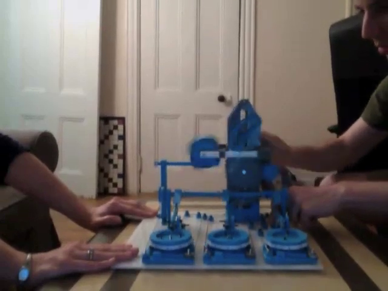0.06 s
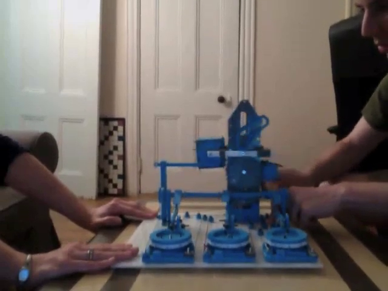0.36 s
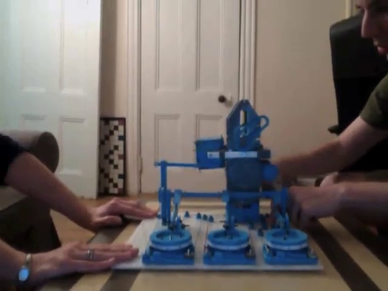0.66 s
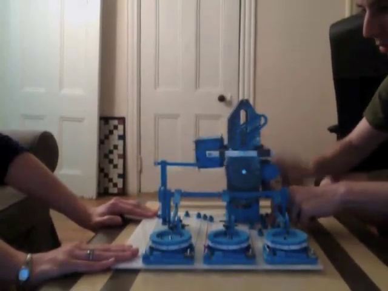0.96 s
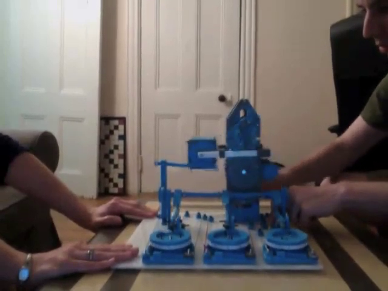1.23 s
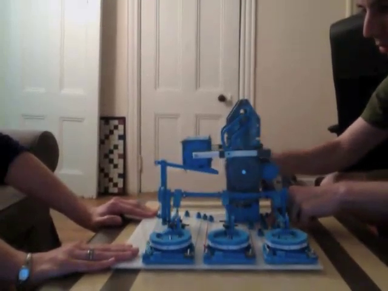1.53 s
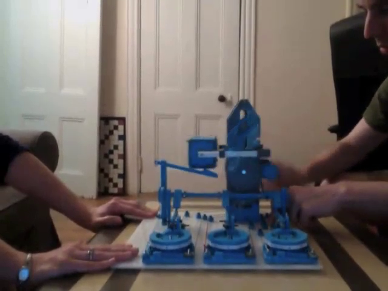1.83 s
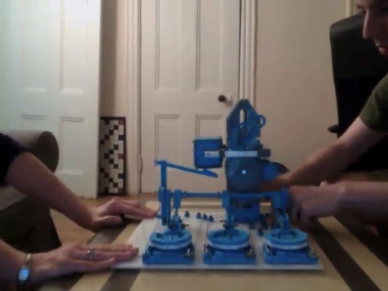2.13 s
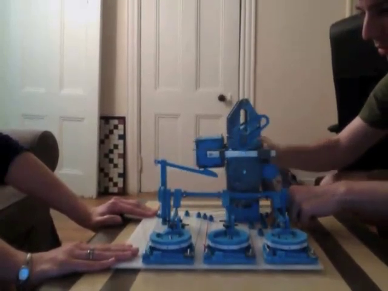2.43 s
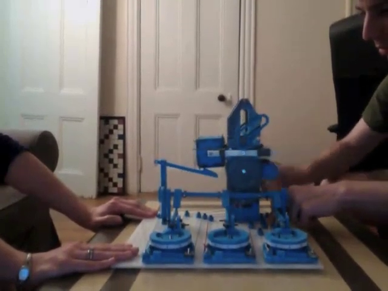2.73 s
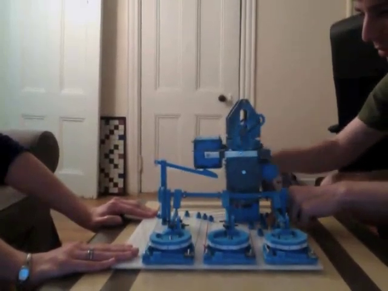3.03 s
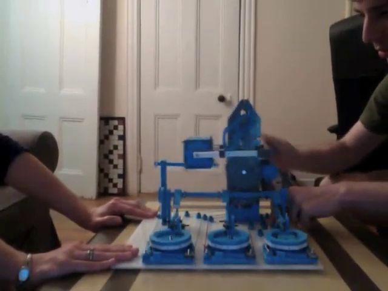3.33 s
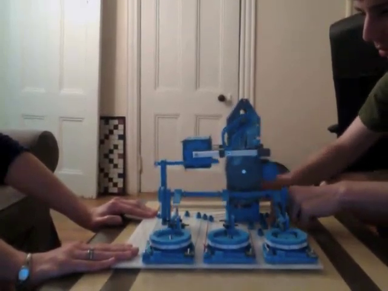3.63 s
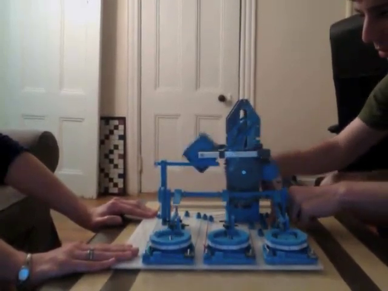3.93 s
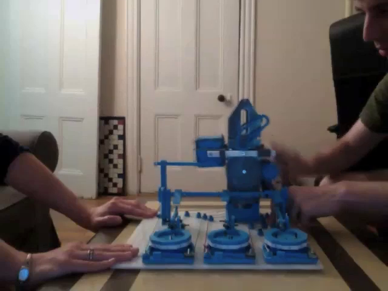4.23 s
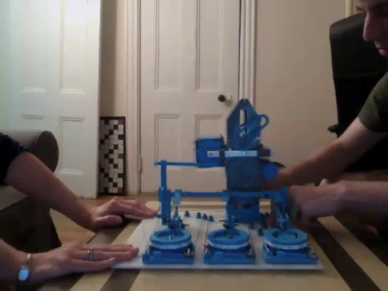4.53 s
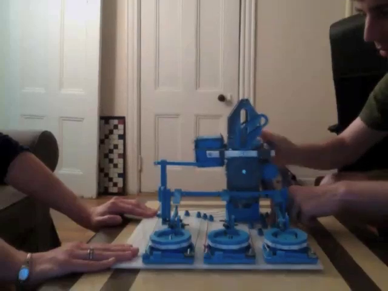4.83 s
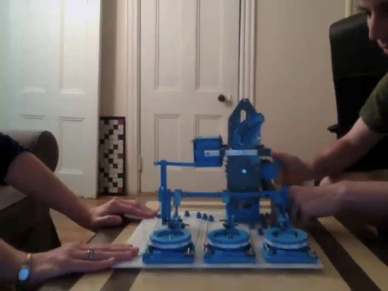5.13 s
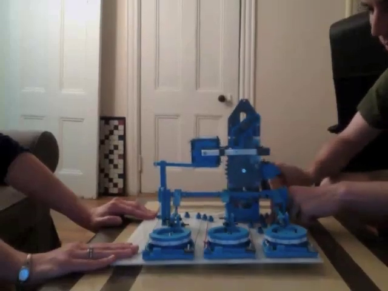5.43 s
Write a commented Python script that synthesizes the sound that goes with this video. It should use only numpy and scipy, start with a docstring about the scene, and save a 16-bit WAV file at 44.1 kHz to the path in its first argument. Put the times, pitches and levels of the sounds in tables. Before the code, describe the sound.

A large plastic machine on a board is cranked by hand in a small room. Its levers give irregular hollow clacks that thud lightly into the board, mixed with dry knocks, small ticks and the rubbing chatter of gears. Two louder, rattling clacks stand out, one at the start and one about four seconds in, then the clatter thins. The microphone is fairly near, with a brief room echo and faint background noise.

```python
"""Levers clack as a large plastic machine on a board is cranked by hand in a small room.
Each impact rings the damped modes of the hollow parts and thuds into the board; a cam tocks and
small catches tick. Between blows, stick-slip friction makes the parts chatter, rub and judder;
loose pieces shiver after the heaviest blows. The room rings briefly over a faint steady background."""
import sys
import numpy as np
from scipy import signal
from scipy.fft import rfft, irfft
from scipy.io import wavfile

SR = 44100
rng = np.random.default_rng(int(sys.argv[2]) if len(sys.argv) > 2 else 0)


def store_wav(level_fs):
    """Save 16-bit WAV to argv[1]."""
    pcm = np.round(np.clip(np.atleast_2d(level_fs), -1, 1) * 32767)
    wavfile.write(sys.argv[1], SR, pcm.T.astype(np.int16))


N = 250488

# modes of the hollow parts, the stiff edges and teeth, and the board: f/Hz, level/dB, T60/s
PART_MODES = [(652, -4.5, 0.092), (839.5, -0.5, 0.054), (1042, -5.5, 0.057), (1187.6, -9.5, 0.11),
              (1392, -13, 0.064), (1556.5, 0, 0.039), (1845, -2.5, 0.028), (2160, -6, 0.028),
              (2672, 0.5, 0.029), (3310, 1, 0.02), (3710, 4.5, 0.0097), (4333, 4.5, 0.015),
              (5100, -1, 0.019), (6334, 0.5, 0.01)]
EDGE_MODES = [(5910, 0.5, 0.011), (7160, -4, 0.035), (9500, -4, 0.018), (9960, 2.5, 0.045),
              (10790, 6.5, 0.015), (11760, -2, 0.028), (13700, -10, .015), (15100, -15, 0.027)]
BOARD_MODES = [(119.8, -11.5, 0.23), (183.8, -5, 0.1), (224.4, -4, 0.051), (266.6, -5, 0.27),
               (298.3, -2, 0.14), (381.2, -7.5, 0.21), (495.5, -4.5, 0.13), (635.2, 9, 0.059)]


def clacks(graze_lead_s=0.0047, graze_db=-11.5, soft_octaves=0.42, hard_octaves=0.84):
    """Impact excitation: the harder a lever strikes, the wider the band of modes it rings."""
    # blows: t/s, ring level/dB, ring centre f/Hz, contact snap level/dB, board thud level/dB
    blows = [(0.0123, -27.5, 2260, -42.5, -43), (0.1848, -31, 2000, -45, -54),
             (0.192, -19.5, 2400, -27, -39), (0.1995, -26.5, 1980, -45, -33),
             (0.234, -26, 1120, -41, -32.5), (0.813, -35.5, 1630, -58, -43.5),
             (0.838, -33.5, 1560, -51, -40.5), (1.11, -26.5, 1170, -38.5, -34.5),
             (1.2488, -31.5, 2400, -38.5, -39.5), (1.6198, -37.5, 1620, -42.5, -50),
             (1.724, -32, 1700, -39, -38.5), (1.964, -34.5, 2160, -54, -62), (1.982, -35, 1910, -56, -54),
             (2.0126, -30, 2100, -44, -69), (2.5763, -37.5, 950, -79, -45), (3.052, -34, 1750, -43, -42),
             (3.1081, -27.5, 1050, -50.5, -36), (3.192, -31.5, 1350, -42.5, -42.5),
             (3.505, -33, 1470, -50, -38), (3.526, -32.5, 1640, -48.5, -40),
             (3.7565, -34.5, 1480, -45.5, -50), (3.9058, -36, 2730, -40, -57),
             (4.044, -22.5, 2600, -33, -41), (4.0516, -23.5, 1840, -32.5, -44),
             (4.0814, -39, 1860, -38.5, -44.5), (4.167, -41, 2840, -53, -52.5),
             (4.4329, -34.5, 730, -71, -41), (4.4987, -42, 880, -63, -39.5),
             (4.719, -39.5, 1570, -56.5, -49.5), (4.8227, -35.5, 1760, -46.5, -70),
             (5.655, -34, 1620, -42, -51)]
    out = np.zeros(N)
    for s, ring_db, hz, snap_db, thud_db in blows:
        hardness = np.clip(1 + (snap_db - ring_db) / 33, 0, 1)  # a soft blow has little snap
        octaves = soft_octaves + (hard_octaves - soft_octaves) * hardness
        graze = ring(PART_MODES, spread=0.073, rise_s=0.0011, grit_db=-14.5, centre_hz=hz, size=1500)
        body = ring(PART_MODES, spread=0.056, rise_s=0.001, grit_db=-2.5, centre_hz=hz, octaves=octaves)
        snap = ring(EDGE_MODES, spread=0.1, rise_s=0.00081, grit_db=1, size=1200, count=5)
        thud = ring(BOARD_MODES, spread=0.026, rise_s=0.0025, grit_db=-14, size=5000, count=2)
        # loose parts touch lightly just before they seat
        add(out, s - graze_lead_s, gain_of(ring_db + graze_db) * hardness * graze)
        add(out, s, gain_of(ring_db + 1) * body)
        add(out, s, gain_of(snap_db + 0.5) * snap)
        add(out, s, gain_of(thud_db + 1) * thud)
    return out


def cam(snap_db=-25, thud_db=-14.5):
    """Damped free vibration: the cam drops into a notch and a few short modes give a dry tock."""
    # drops: t/s, level/dB, ring centre f/Hz
    drops = [(0.396, -34, 1020), (0.4935, -42.5, 800), (0.783, -39.5, 2220), (0.9827, -29, 1560),
             (1.0152, -24.5, 1520), (1.1662, -34, 1750), (1.2515, -30.5, 1480), (1.2704, -30.5, 1250),
             (1.33, -41, 1930), (1.5733, -51, 2410), (1.7335, -34.5, 1120), (2.4328, -41.5, 1540),
             (2.4773, -39, 1270), (2.532, -43.5, 1700), (2.6787, -33.5, 1560), (2.7226, -41, 990),
             (2.7368, -30.5, 1140), (2.7903, -42.5, 1420), (2.8072, -43, 1680), (2.8293, -39, 1490),
             (3.305, -42.5, 1740), (3.393, -44, 1360), (3.571, -36.5, 2030), (3.587, -32.5, 1100),
             (3.617, -40.5, 1390), (3.6522, -41.5, 2130), (3.8638, -39.5, 1420), (4.374, -29, 1410),
             (4.4817, -40.5, 1820), (4.6933, -41.5, 1310), (4.748, -43, 1530), (4.781, -47, 1700),
             (4.875, -46.5, 4040), (4.9039, -43.5, 1090), (5.3051, -37.5, 2350), (5.338, -40, 1600),
             (5.3651, -40.5, 1220), (5.462, -39, 1200), (5.56, -43, 4220)]
    # modes of the cam: f/Hz, level/dB, T60/s
    cam_modes = [(716, -5.5, 0.071), (996, 3.5, 0.031), (1340, -6.5, 0.053), (1591, -1.5, 0.033),
                 (2172, 3, 0.026), (2730, -8.5, 0.027), (3260, -1, 0.027), (4106, -4, 0.033),
                 (5200, -3.5, 0.014)]
    out = np.zeros(N)
    for s, db, hz in drops:
        tock = ring(cam_modes, spread=0.025, rise_s=0.0009, grit_db=-6,
                    centre_hz=hz, octaves=0.62, count=1)
        snap = ring(EDGE_MODES, spread=0.078, rise_s=0.00021, grit_db=-12.5,
                    centre_hz=5360, octaves=0.22, size=1200)
        thud = ring(BOARD_MODES, spread=0.039, rise_s=0.0016, grit_db=-13, size=4000, count=1)
        add(out, s, gain_of(db) * tock)
        add(out, s, gain_of(db + snap_db) * snap)
        add(out, s, gain_of(db + thud_db) * thud)
    return out


def sliding(slips_per_s=200, catches_per_s=200, dull_hz=2438, rasp_db=8, gear_fizz_db=-25, count=18):
    """Stick-slip friction: gears and levers move in tiny blows, each part at its own pitch."""
    # gears turning until the crank slows: t/s, level/dB
    gears = [(0, -59.5), (1.201, -50.5), (2.4, -58.5), (3.4, -49.5), (4.751, -60.5), (5.149, -66.5),
             (5.68, -62)]
    # lever strokes: start t/s, length t/s, part chatter level/dB, edge fizz level/dB
    strokes = [(0, 0.038, -33.5, -45), (0.18, 0.093, -41.5, -49), (0.383, 0.045, -44.5, -72),
               (0.835, 0.058, -46, -58), (1.124, 0.2, -46, -69), (1.414, 0.047, -46, -65.5),
               (1.566, 0.15, -40.5, -58), (1.974, 0.039, -41.5, -77), (2.211, 0.093, -52.5, -80.5),
               (2.519, 0.06, -41, -69.5), (2.795, 0.15, -46.5, -65), (3.062, 0.074, -36.5, -55),
               (3.178, 0.068, -37.5, -49), (3.481, 0.13, -41, -68), (3.912, 0.057, -33, -42),
               (3.986, 0.056, -46.5, -55), (4.046, 0.096, -38.5, -65), (4.482, 0.046, -38.5, -71),
               (4.682, 0.23, -52.5, -79), (5.552, 0.078, -52.5, -68)]
    body_level = gain_of(np.interp(np.arange(N) / SR, *np.transpose(gears)))
    fizz_level = gain_of(gear_fizz_db) * body_level
    for start, length, body_db, fizz_db in strokes:
        stroke = travel(start, length)
        body_level = np.maximum(body_level, gain_of(body_db) * stroke)
        fizz_level = np.maximum(fizz_level, gain_of(fizz_db) * stroke)
    body, fizz = np.zeros(N), np.zeros(N)
    for scale in 2 ** (0.73 * np.linspace(-1, 1, count)):  # large parts ring low, small ones high
        slips = patter(slips_per_s / count, uneven_db=2.5)
        catches = patter(catches_per_s / count, uneven_db=3.5)
        part = ring(PART_MODES, spread=0.0812, rise_s=0.0006, grit_db=-3.5,
                    centre_hz=1550 / scale, octaves=0.45)
        board = ring(BOARD_MODES, spread=0.059, rise_s=0.0032, grit_db=-14, size=6000)
        edge = ring(EDGE_MODES, spread=0.065, rise_s=0.00013, grit_db=-5,
                    centre_hz=8200 / scale, octaves=0.17, size=1200)
        body += excite(slips, part) + gain_of(-8.5) * excite(slips, board)
        fizz += excite(catches, edge)
    body = unit_rms(body)
    dull = signal.sosfiltfilt(signal.butter(4, dull_hz, fs=SR, output="sos"), body)
    rasp_level = gain_of(rasp_db) * np.sqrt(body_level * fizz_level)  # treble rasps as the edges bite
    return body_level * dull + rasp_level * (body - dull) + fizz_level * unit_rms(fizz)


def shiver(touches_per_s=5000, rise_s=0.0024, t60_s=0.23):
    """Contact rattle: after a heavy blow, loose pieces buzz together in a bright, decaying crash."""
    # the two heaviest blows: t/s, level/dB
    crashes = [(0.189, -29.5), (4.046, -32.5)]
    # rattle spectrum: f/Hz, spectral level/dB
    spectrum = [(1500, -11.5), (3200, -3.5), (6000, -4), (8500, -4), (12000, 3.5), (15500, -13.5)]
    touches = patter(touches_per_s) * rng.standard_normal(N)
    level = np.zeros(N)
    for s, db in crashes:
        t = np.maximum(np.arange(N) / SR - s, 0)
        level += gain_of(db) * np.minimum(t / rise_s, 1) * decay(t, t60_s)
    return level * coloured(touches, spectrum)


def bumps(hand_t60_s=0.28, size=6000):
    """Low-mode excitation: the rocking frame bumps the board, and hands on it add damping."""
    # bumps: t/s, level before damping/dB
    rocks = [(3.232, -34.5), (4.104, -34.5), (4.137, -52), (4.163, -35.5)]
    out = np.zeros(N)
    damping = decay(np.arange(size) / SR, hand_t60_s)
    for s, db in rocks:
        bump = ring(BOARD_MODES, spread=0.027, rise_s=0.0016, grit_db=-28,
                    centre_hz=303, octaves=0.28, size=size)
        add(out, s, gain_of(db) * bump * damping)
    return out


def rubbing(slips_per_s=900):
    """Friction-driven resonance: a tight joint sings roughly as the machine's bucket swings."""
    # rubs: start t/s, length t/s, level/dB
    rubs = [(3.921, 0.0471, -32), (3.975, 0.01, -45)]
    # modes of the joint: f/Hz, level/dB, T60/s
    joint_modes = [(1496, -2.5, 0.05), (2510, -8, 0.021), (3610, -6.5, 0.017)]
    slips = patter(slips_per_s, uneven_db=-1)
    joint = ring(joint_modes, spread=0.018, rise_s=0.00061, grit_db=-8)
    level = sum(gain_of(db) * travel(start, length) for start, length, db in rubs)
    return level * unit_rms(excite(slips, joint))


def scraping(slips_per_s=1100):
    """Narrow-band friction noise: a part drags into its seat, stirring the modes near one pitch."""
    # scrapes: start t/s, length t/s, level/dB, centre f/Hz
    scrapes = [(1.096, 0.012, -35, 1460), (1.579, 0.03, -41, 2100), (1.63, 0.024, -40, 1230),
               (3.067, 0.023, -38, 724), (4.427, 0.0081, -39.5, 1500), (4.438, 0.069, -44, 630),
               (4.505, 0.031, -41, 1690), (4.69, 0.018, -47.5, 645), (5.452, 0.014, -43.5, 1490)]
    out = np.zeros(N)
    for start, length, db, hz in scrapes:
        part = ring(PART_MODES, spread=0.071, rise_s=0.00035, grit_db=-3, centre_hz=hz, octaves=0.32)
        out += gain_of(db) * travel(start, length) * unit_rms(excite(patter(slips_per_s), part))
    return out


def lever(slips_per_s=700, ping_s=5.5517, ping_db=-35.5):
    """Forced, then free vibration: a lever judders along its guide and, let go at last, pings."""
    # judders: start t/s, length t/s (negative: already fading), level/dB
    judders = [(0.574, 0.01, -35), (4.518, -0.0038, -31.5), (4.561, 0.03, -47)]
    # modes of the lever: f/Hz, level/dB, T60/s
    lever_modes = [(834, 0, 0.055), (1670, 0, 0.04), (1880, -0.5, 0.029), (2607, 1.5, 0.017),
                   (3060, 3, 0.015)]
    slips = patter(slips_per_s)
    response = ring(lever_modes, spread=0.038, rise_s=0.0011, grit_db=-3, size=4000)
    level = sum(gain_of(db) * travel(start, length) for start, length, db in judders)
    out = level * unit_rms(excite(slips, response))
    ping = ring(lever_modes, spread=0.014, rise_s=0.0012, grit_db=-10,
                centre_hz=2560, octaves=0.1, size=3000)
    add(out, ping_s, gain_of(ping_db) * ping)
    return out


def ticks():
    """High-mode excitation: light catches ring only the stiff edges."""
    # catches: t/s, level/dB
    catches = [(0.99, -42.5), (1.099, -43.5), (1.235, -50), (2.9194, -54.5), (3.5716, -41), (4.036, -38.5),
               (5.075, -59), (5.306, -60.5), (5.449, -49.5)]
    out = np.zeros(N)
    for s, db in catches:
        tick = ring(EDGE_MODES, spread=0.07, rise_s=0.00015, grit_db=3,
                    centre_hz=10100, octaves=1, size=1200)
        add(out, s, gain_of(db) * tick)
    return out


def room_tail(gap_s=0.0081, build_s=0.00052, size=32000, spacing=10):
    """Reverberation: sparse reflections arrive after a short gap and decay band by band."""
    # reverberation time: f/Hz, T60/s
    room_t60 = [(150, 1), (400, 0.43), (1000, 0.23), (2800, 0.31), (7000, 0.33), (15000, 0.18)]
    # strength of the tail: f/Hz, level/dB
    tail_levels = [(100, -6.5), (300, -3), (1000, -10.5), (2500, -5.5), (5000, 0), (8000, 2), (12000, -8),
                   (16000, 1)]
    taps = np.zeros(size)
    slots = np.arange(0, size - spacing, spacing)
    taps[slots + rng.integers(0, spacing, len(slots))] = rng.choice([-1., 1.], len(slots))
    hz, t, bands = signal.stft(taps, SR, nperseg=256)
    fade = decay(t, value_at(room_t60, hz)[:, None])
    fade /= np.sqrt(np.mean(fade ** 2, axis=1, keepdims=True))
    bands *= fade * gain_of(value_at(tail_levels, hz))[:, None]
    tail = signal.istft(bands, SR, nperseg=256)[1][:size] / np.sqrt(len(slots))
    onset = 1 - np.exp(-np.arange(size) / SR / build_s)
    return np.r_[np.zeros(int(gap_s * SR)), tail * onset]


def room(x, count=3, step_s=0.1):
    """Reverberation: random tails crossfade in turn, keeping the decay smooth and free of tones."""
    turn = np.arange(N) / SR / step_s
    shares = [np.sqrt(np.clip(1 - abs((turn - k) % count - 1), 0, 1)) for k in range(count)]
    return sum(excite(x * share, room_tail()) for share in shares)


def background(air_db=-58):
    """Stationary noise: a soft continuous spectrum with two faint lines of hum."""
    # room noise: f/Hz, relative spectral level/dB
    air_spectrum = [(25, -66.5), (53, -57), (70, -12), (138, -14), (189, -7.5), (245, -1.5), (273, -4),
                    (345, -5), (486, -7.5), (780, -18.5), (2170, -21.5), (8080, -39.5), (10800, -54.5),
                    (16000, -50)]
    # hum: f/Hz, rms level/dB
    hum_lines = [(85, -79), (120, -74)]
    t = np.arange(N) / SR
    air = coloured(rng.standard_normal(N), air_spectrum)
    hum = sum(gain_of(db) * np.sqrt(2) * np.sin(2 * np.pi * (hz * t + rng.random()))
              for hz, db in hum_lines)
    return gain_of(air_db) * air + hum


def ring(modes, spread, rise_s, grit_db, centre_hz=None, octaves=0.89, size=2200, count=3):
    """Modal superposition: one blow rings `count` detuned copies of each mode, plus contact grit."""
    hz, db, t60 = np.repeat(np.array(modes, float), count, axis=0).T
    t = np.arange(size) / SR
    hz = hz * np.exp(spread * rng.standard_normal(len(hz)))
    weight = gain_of(db) * rng.uniform(0.17, 1, len(hz))
    if centre_hz is not None:  # where the blow lands favours one band
        weight = weight / (1 + (np.log2(hz / centre_hz) / octaves) ** 2)
    phase = 2 * np.pi * (hz[:, None] * t + rng.random((len(hz), 1)))
    tone = weight @ (decay(t, t60[:, None]) * np.sin(phase))
    bins, rank = np.fft.rfftfreq(size, 1 / SR), np.argsort(hz)
    colour = np.interp(bins, hz[rank], weight[rank], left=0, right=0)
    grit = irfft(rfft(rng.standard_normal(size)) * colour, size) * decay(t, np.median(t60))
    onset = 1 - np.exp(-(t / rise_s) ** 2)
    blow = (unit_rms(tone) + gain_of(grit_db) * unit_rms(grit)) * onset
    return blow * np.sqrt(0.008 * SR / np.sum(blow ** 2))  # the energy of 8 ms at rms 1


def travel(start, length, rise_s=0.0024, fade_s=0.014):
    """Stroke envelope: linear rise, hold, exponential fade."""
    t = np.arange(N) / SR - start
    return np.clip(t / rise_s, 0, 1) * np.exp(-np.clip((t - length) / fade_s, 0, 20))


def patter(per_s, uneven_db=0):
    """Poisson process: random impulses whose levels scatter with uneven_db."""
    return (rng.random(N) < per_s / SR) * gain_of(uneven_db * np.minimum(rng.exponential(1, N), 3))


def excite(drive, response):
    """Convolution: a drive passes through an impulse response."""
    return signal.oaconvolve(drive, response)[:N]


def coloured(x, spectrum):
    """Spectral shaping by a table of levels, at rms 1."""
    gain = gain_of(value_at(spectrum, np.fft.rfftfreq(N, 1 / SR)))
    return unit_rms(irfft(rfft(x) * gain, N))


def decay(t, t60):
    """Exponential damping: 60 dB down at t60."""
    return np.exp(-np.log(1000) * t / t60)


def gain_of(db):
    """Decibels to amplitude."""
    return 10 ** (np.asarray(db) / 20)


def unit_rms(x):
    """Normalisation to rms 1."""
    return x / np.sqrt(np.mean(x ** 2) + 1e-20)


def value_at(points, hz):
    """Interpolation along a log-frequency axis."""
    f, value = np.transpose(points)
    return np.interp(np.log(hz + 1), np.log(f + 1), value)


def add(mix, s, sound):
    """Superposition: a sound joins the mix at time s."""
    part = mix[max(round(s * SR), 0):][:len(sound)]
    part += sound[:len(part)]


def scene(count=3, cam_room_db=-0.5):
    """Directivity: each side colours a blow its own way; one faces the microphone, all fill the room."""
    friction = sliding() + rubbing() + scraping() + lever() + shiver()
    sides = [(clacks() + ticks() + bumps() + friction, cam()) for _ in range(count)]
    direct = sum(sides[0])
    echo = sum(room(machine + gain_of(cam_room_db) * tocks) for machine, tocks in sides)
    return (direct + echo / np.sqrt(count) + background())[None]


def record(dry, low_hz=72, high_hz=16200):
    """Band limiting: a small microphone sheds deep bass, and a low-pass cuts the top treble."""
    thin = signal.sosfilt(signal.butter(3, low_hz, "highpass", fs=SR, output="sos"), dry)
    lowpass = signal.firwin(255, high_hz, window=("kaiser", 9), fs=SR)
    return signal.oaconvolve(thin, lowpass[None], "same")


dry = scene()
out = record(dry)
store_wav(out)
```